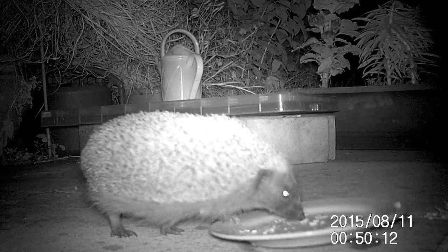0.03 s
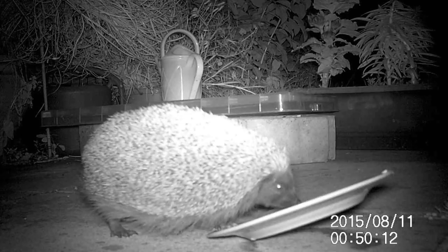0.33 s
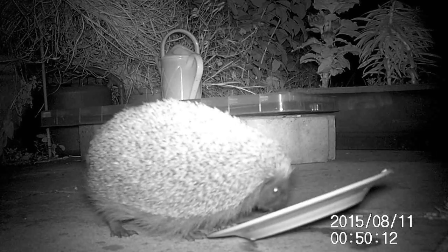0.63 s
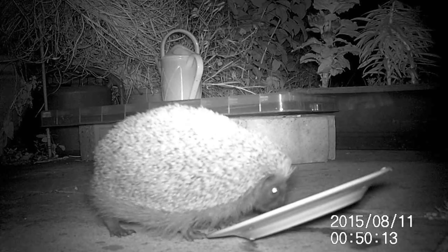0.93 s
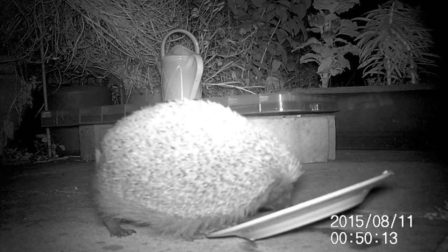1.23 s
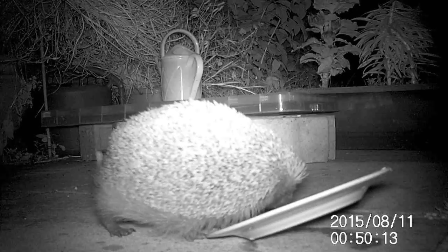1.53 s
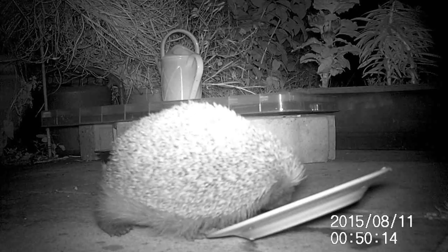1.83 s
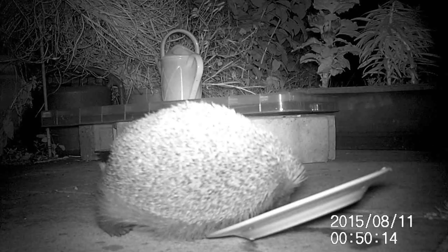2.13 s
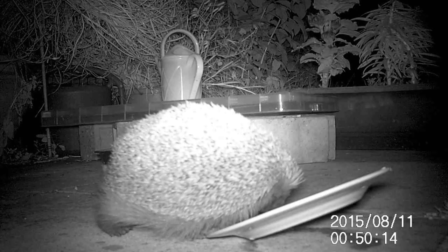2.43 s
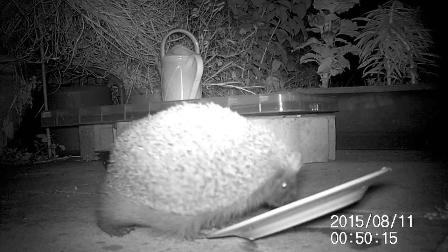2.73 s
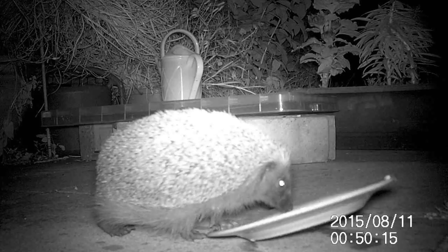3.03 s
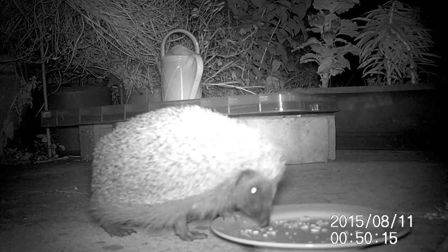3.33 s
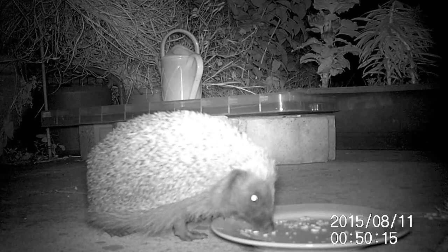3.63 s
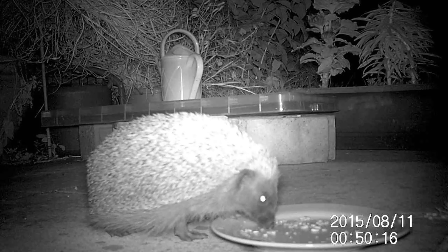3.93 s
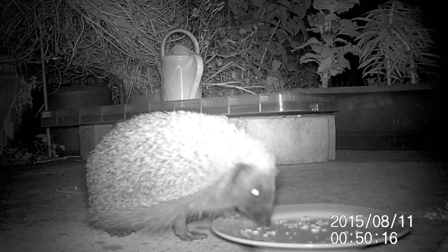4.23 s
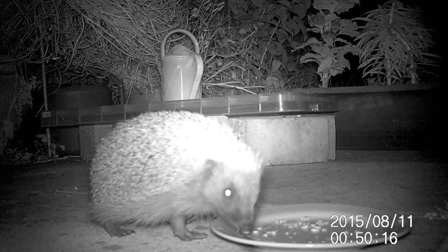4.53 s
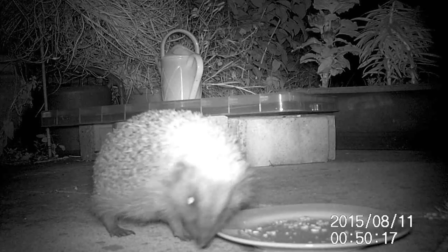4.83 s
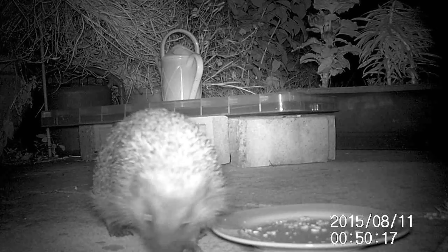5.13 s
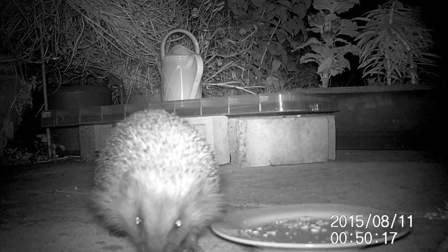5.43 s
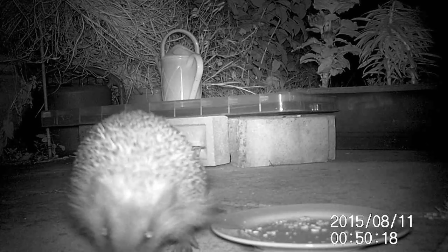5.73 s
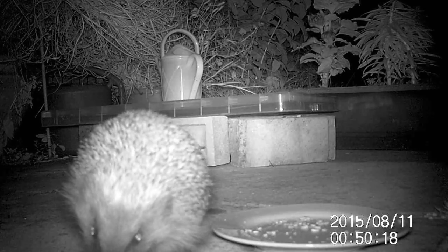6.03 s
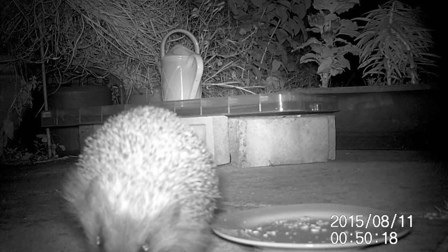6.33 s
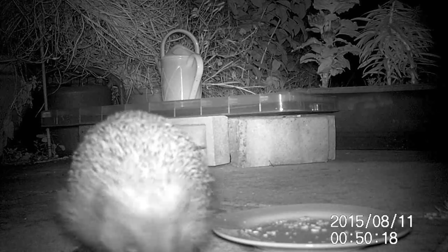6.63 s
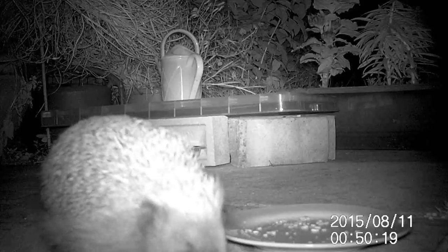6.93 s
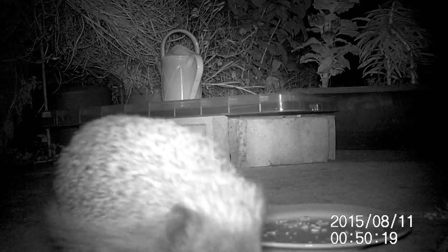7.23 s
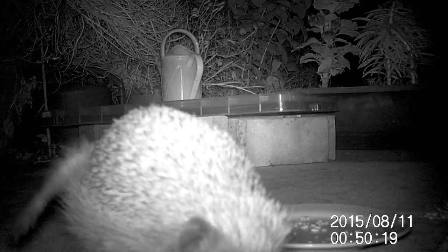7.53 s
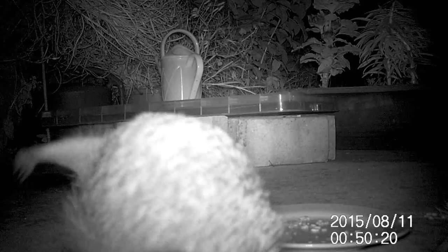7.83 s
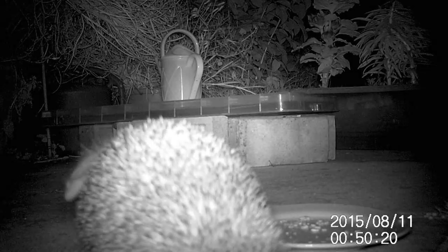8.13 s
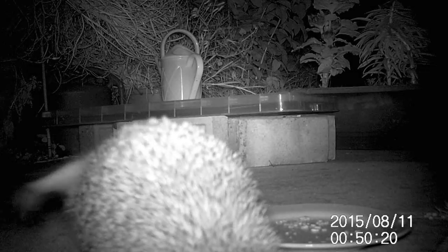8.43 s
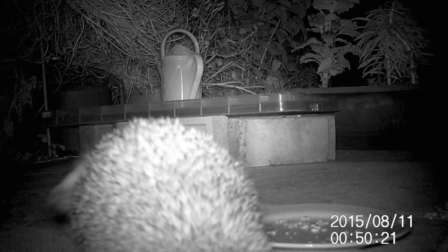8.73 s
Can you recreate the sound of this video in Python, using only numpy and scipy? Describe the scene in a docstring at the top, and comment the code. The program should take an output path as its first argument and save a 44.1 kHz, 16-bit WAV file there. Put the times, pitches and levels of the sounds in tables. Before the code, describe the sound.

A steady hiss and low buzz from a small microphone run under a quiet night garden. In the first half second, a metal plate knocks lightly several times on paving, ringing briefly and crunching grit, with small scuffs from a hedgehog. Faint ticks of claws and spines follow, and an animal wails very faintly far away at about 1.5 seconds. Just after 3 seconds the plate slips in tiny jerks, then lands at 3.25 with a loud, slightly overloaded clank and a quick, dying rattle. A scuff comes at 4.6 and a faint plate tick at 4.9. More thin, distant wails drift by between 5.5 and 7.2 seconds, among scattered rustles. Soft, dull bumps occur now and then, mostly between 5 and 8 seconds. From about 7.8 to 8.8 the hedgehog scratches its spines close by, in about six soft, quick, bristly strokes.

```python
"""A metal plate clanks onto the paving of a night garden after a hedgehog treads on its rim and tips it up.
Each knock of the rim makes the plate ring and crunches a little grit. The hedgehog's claws and stiff
spines rustle in tiny clicks, and near the end it scratches itself close by. Far off an animal wails
faintly, and now and then there is a soft, dull bump. A small night camera adds hiss and a low buzz at
its frame rate, and overloads on the clank."""
import sys
import numpy as np
from scipy import signal
from scipy.fft import rfft, irfft
from scipy.io import wavfile

SR = 44100
rng = np.random.default_rng(int(sys.argv[2]) if len(sys.argv) > 2 else 0)


def unload_wav(signal):
    """Save mono or channel-first audio to the path in sys.argv[1] as 16-bit WAV at rate SR, clipped to [-1, 1]."""
    wavfile.write(
        sys.argv[1],
        SR,
        np.round(np.clip(np.atleast_2d(signal).T, -1, 1) * 32767).astype(np.int16),
    )


N = 395577
T = np.arange(N) / SR

# Levels in the tables are relative: filters and gains act on them later.
# tone of the hiss: pitch_hz, level_db
HISS_TONE = [(20, 14.5), (100, 14.5), (250, 14), (500, 9), (1000, 4), (2000, -0.5), (2800, -0.5),
             (3200, -0.5), (3700, -4), (5000, -5.5), (5600, -16.5)]
# tone of the camera's buzz: pitch_hz, level_db
BUZZ_TONE = [(4, -21), (12, -11), (30, 3), (120, 1.5), (220, -2), (330, -16.5), (500, -14), (670, -4),
             (900, -18), (1350, -12.5), (1800, -28.5), (5000, -30)]
# dips in the camera's power supply, one kind for each load on it: width_ms, depth_db, delay_ms
POWER_DIPS = [(3.6, -3, -2), (5.2, 0, 0), (5.1, 0, 0), (4.4, -1.5, -.8), (7.2, -2.2, .6), (7.3, -2.8, .6)]
# late on, the load holds still for a while at a time: start_s, row_of_power_dips
STEADY_LOADS = [(8.13, 1), (8.43, 4), (8.76, 2)]
# soft low bumps: start_s, level_db
SOFT_BUMPS = [(1.056, -52), (4.774, -50), (5.769, -50), (7.063, -49), (7.757, -48), (7.955, -49),
              (8.058, -45)]
# tone of the bumps: pitch_hz, level_db
BUMP_TONE = [(30, -6), (100, -1), (280, 0), (420, -16), (900, -40)]
# the far animal's calls: start_s, length_s, rise_s, top_pitch_hz, fall_hz, level_db
FAR_CALLS = [(1.463, .76, .36, 1130, 210, -62.5), (5.479, .14, 0.046, 980, 10, -60),
             (5.961, .58, .14, 1105, 120, -65), (6.52, 0.71, .17, 1100, 260, -65.5)]
# single scuffs of claws and spines: peak_time_s, level_db, decay_s
SCUFFS = [(.129, -51, 0.017), (.1615, -48, .007), (0.224, -49, .005), (.246, -49, .008),
          (1.287, -58, .0055), (1.556, -58, .012), (1.774, -54, .008), (2.227, -56, .007),
          (2.96, -57, .007), (4.6365, -47.5, .006), (5.577, -58, .008), (5.693, -57, .006),
          (6.779, -50.5, 0.0087), (6.84, -55, 0.017), (6.989, -57, 0.024), (7.132, -53.5, 0.01)]
# tone of the spines: pitch_hz, level_db
SPINE_TONE = [(500, -27.5), (1500, -23.5), (2500, -14), (2900, -2.5), (3180, 7.5), (3450, -5.5), (3700, -8),
              (4300, -10.5), (5300, -22.5)]
# tone of the grit and of the plate's many weak, crowded notes: pitch_hz, level_db
GRIT_TONE = [(100, -30.5), (250, -7.5), (450, -2), (900, -1), (1400, -4.5), (1900, 1.5), (2300, -4),
             (3300, 5.5), (3900, -8.5), (4500, -18.5), (5300, -23.5)]
# the notes the plate rings with (its modes): pitch_hz, level_db, fade_s (time to fall 60 dB)
PLATE_NOTES = [(515, -28.1, 0.07), (603, -24.3, 0.087), (782, -17, 0.125), (879, -18.5, 0.11),
               (980, -17.4, 0.1), (1037, -12.5, 0.12), (1108, -17.7, 0.094), (1168, -25.8, 0.1),
               (1247, -27.3, 0.093), (1345, -19, 0.1), (1460, -21, 0.07), (1593, -24.5, 0.099),
               (1823, -36.1, 0.169), (1924, -35.6, 0.12), (2048, -28.5, 0.106), (2128, -20, 0.11),
               (2251, -5.5, 0.17), (2454, -19, 0.06), (2697, -25.2, 0.1), (2778, -11, 0.11),
               (2938, -22.4, 0.06), (3109, -32.8, 0.142), (3219, -33.5, 0.163), (3320, -22.0, 0.073),
               (3560, -8.5, 0.11), (4183, -16.6, 0.095), (5090, -46.2, 0.095), (5539, -50.4, 0.118)]
# the rim hits the paving (once, at 0.270 s, a paw thumps the plate dully) and favours one pitch band: start_s,
# level_db, band_hz, lift_db, crunch_db
RIM_KNOCKS = [(.0525, -27.5, 4200, 10, 15.5), (.059, -35, 4200, 5.5, 12), (.0665, -33, 4200, 10.5, 11),
              (.1107, -42, 4200, 6, 18), (.2075, -37, 3150, 15, 12.5), (.270, -37.5, 550, 9, 15.5),
              (.4427, -40, 3560, 11, 4), (1.404, -56, 2250, 1.5, 18), (3.2422, -13, 1000, 8.5, 2.5),
              (3.2472, -14.5, 3800, 19.5, 0.5), (3.2521, .5, 3000, 2, 8.5), (3.2548, -7.5, 3560, 20.5, 10),
              (4.87, -51, 3560, 14, -8)]


def from_db(db):
    """Turn decibels into a number to multiply by."""
    return 10 ** (np.asarray(db) / 20)


def normalise(x):
    """Scale a sound to an average (rms) level of 1."""
    return x / np.sqrt(np.mean(x ** 2))


def mix_in(out, start_s, x):
    """Add x to out from start_s on."""
    i = max(int(start_s * SR), 0)
    out[i:i + len(x)] += x[:max(len(out) - i, 0)]


def shape_tone(x, points, size=8192):
    """Filter a sound along a curve of (pitch_hz, level_db) points."""
    hz, db = np.transpose(points)
    freqs = np.maximum(np.fft.rfftfreq(size, 1 / SR), 1)
    gains = from_db(np.interp(np.log(freqs), np.log(hz), db))
    # folding the cepstrum keeps the filter from sounding before its input does
    cepstrum = irfft(np.log(gains))
    cepstrum[1:size // 2] *= 2
    cepstrum[size // 2 + 1:] = 0
    return signal.fftconvolve(x, irfft(np.exp(rfft(cepstrum))))[:len(x)]


def toned_noise(tone, samples=N):
    """Noise with the given tone, at an average level of 1."""
    return normalise(shape_tone(rng.standard_normal(samples), tone))


def fade(t, fade_s):
    """Die away smoothly, falling 60 dB in fade_s."""
    return np.exp(-np.log(1000) * t / fade_s)


def wander(steps_per_s):
    """Random values joined by straight lines."""
    steps = rng.standard_normal(int(T[-1] * steps_per_s) + 2)
    return np.interp(T * steps_per_s, np.arange(len(steps)), steps)


def quickening(k, start_s, gap_s, shrink):
    """Time of step k when each gap is shrink times the one before."""
    return start_s + gap_s * (1 - shrink ** k) / (1 - shrink)


def echoes(x, fade_s, echo_db):
    """Add the scattered echoes that come back from walls and plants."""
    t = T[:SR]
    tail = rng.standard_normal(SR) * fade(t, fade_s) * (1 - np.exp(-t / .004))
    return x + from_db(echo_db) * signal.fftconvolve(x, tail / np.linalg.norm(tail))[:N]


def hiss(gain_db=-57.5, drift_db=-.34):
    """Microphone noise and still night air make an even hiss."""
    return toned_noise(HISS_TONE) * from_db(gain_db + drift_db * wander(2.8))


def camera_buzz(gain_db=-34.5, first_frame_s=.0182, frame_s=.033192, rounds_per_s=5.05, scatter_ms=.093):
    """Each picture frame pulls the power down for a few milliseconds, which leaks into the sound."""
    dips = np.zeros(N)
    starts = np.arange(first_frame_s, T[-1], frame_s)
    rows = (starts * rounds_per_s % 1 * len(POWER_DIPS)).astype(int)  # a repeating round of loads
    for start_s, row in STEADY_LOADS:
        rows[starts > start_s] = row
    for start_s, row, chance in zip(starts, rows, rng.standard_normal((len(starts), 2))):
        width_ms, depth_db, delay_ms = POWER_DIPS[row]
        width_s = (width_ms + scatter_ms * chance[0]) / 1000
        delay_s = (delay_ms + scatter_ms * chance[1]) / 1000
        mix_in(dips, start_s + delay_s - width_s / 2, -from_db(depth_db) * np.ones(int(width_s * SR)))
    rasp = 1 + rng.standard_normal(N)  # the load is restless during each dip
    return from_db(gain_db) * shape_tone(dips * rasp, BUZZ_TONE)


def bumps(attack_s=.002, fade_s=.13):
    """Short bursts of low noise sound as soft, dull bumps."""
    t, loudness = T[:SR // 2], np.zeros(N)
    for start_s, level_db in SOFT_BUMPS:
        mix_in(loudness, start_s, from_db(level_db) * (1 - np.exp(-t / attack_s)) * fade(t, fade_s))
    return loudness * toned_noise(BUMP_TONE)


def far_wails(rise_hz=85, attack_s=.1, release_s=.12, flutter_db=2.2):
    """A far animal's thin, unsteady calls climb in pitch and sag again, blurred by the distance."""
    calls = np.zeros(N)
    wobble = 1 + .04 * wander(130)
    for start_s, length_s, rise_s, top_hz, fall_hz, level_db in FAR_CALLS:
        t = np.clip(T - start_s, 0, length_s)
        left_to_climb = np.maximum(1 - t / rise_s, 0)
        sag = (np.maximum(t - rise_s, 0) / (length_s - rise_s)) ** 2
        pitch_hz = (top_hz - rise_hz * left_to_climb - fall_hz * sag) * wobble
        swell = np.minimum(t / attack_s, 1) * np.minimum((length_s - t) / release_s, 1)
        calls += from_db(level_db) * swell * np.sin(2 * np.pi * np.cumsum(pitch_hz) / SR)
    return echoes(calls * from_db(flutter_db * wander(15)), fade_s=.44, echo_db=-3)


def claw_ticks(count=10, from_s=1.3, to_s=7.3, level_db=-62, scatter_db=2, decay_s=.007):
    """The claws tick at random as the hedgehog looks for food; gives rows like SCUFFS."""
    return [(from_s + (to_s - from_s) * (k + when) / count, level_db + scatter_db * (2 * size - 1), decay_s)
            for k, (when, size) in enumerate(rng.random((count, 2)))]


def leg_strokes(count=6, period_s=.174, hardest_at_s=8.26):
    """The scratching hind leg settles to its pace as its effort swells and eases; rows like SCUFFS."""
    def time_s(k):
        return quickening(k, start_s=7.792, gap_s=.054, shrink=.58) + k * period_s

    def effort_db(s):
        return -41.2 - 18 * (s - hardest_at_s) ** 2

    kick_times = time_s(np.arange(count))
    kicks = [(s, effort_db(s), .0075) for s in kick_times]
    # the claws meet the coat just before each kick, and the leg swings back around the kicks
    touches = [(s - .016, effort_db(s) - 9, .007) for s in kick_times]
    swings = [(s, effort_db(s) - 10.5, .013) for s in time_s(np.arange(count + 1) - .5)]
    return kicks + touches + swings


def hedgehog_rustle(gain_db=-2, clicks_per_s=5000, scatter_db=4, bend_s=.0013, brush_db=-20.5, brush_s=.03):
    """Each stroke bends many stiff spines, which click back; softer brushing leads in and out."""
    force = np.zeros(N)
    t = T[:SR // 2] - .25  # zero at the peak of the stroke
    brush = from_db(brush_db) * np.exp(-abs(t) / brush_s)
    for peak_time_s, level_db, decay_s in SCUFFS + leg_strokes() + claw_ticks():
        flick = np.exp(-np.maximum(-t / bend_s, t / decay_s))
        force += np.interp(T, peak_time_s + t, from_db(level_db) * (flick + brush), left=0, right=0)
    clicks = (rng.random(N) < clicks_per_s / SR) * rng.choice([-1, 1], N)
    sizes = from_db(scatter_db * rng.standard_normal(N))
    return from_db(gain_db) * force * normalise(shape_tone(clicks * sizes, SPINE_TONE))


def plate_slips(count=4, level_db=-51, band_hz=3000, lift_db=7, crunch_db=12.5):
    """The tilted plate slips in ever quicker jerks before it falls; gives rows like RIM_KNOCKS."""
    times = quickening(np.arange(count), start_s=3.09, gap_s=.055, shrink=.73)
    return [(s, level_db, band_hz, lift_db, crunch_db) for s in times]


def plate_bounces(count=3, level_db=-20, loss_db=8, band_hz=2250, lift_db=6, crunch_db=0):
    """The fallen plate rocks, each bounce sooner and weaker; gives rows like RIM_KNOCKS."""
    times = quickening(np.arange(count), start_s=3.2825, gap_s=.0205, shrink=.58)
    return [(s, level_db - k * loss_db, band_hz, lift_db, crunch_db) for k, s in enumerate(times)]


def metal_plate(linger_db=-23, linger_stretch=1.9, wash_db=-20, grit_db=-11):
    """Each hit of the rim rings the same notes, over a wash of weaker ones, and crunches some grit."""
    t, out = T[:SR // 2], np.zeros(N)
    ring = np.zeros(len(t))
    for k, (pitch_hz, level_db, fade_s) in enumerate(PLATE_NOTES):
        # a small share of each note lingers; neighbouring notes swing opposite ways at the rim
        decay = fade(t, fade_s) + from_db(linger_db) * fade(t, fade_s * linger_stretch)
        ring += (-1) ** k * from_db(level_db) * decay * np.sin(2 * np.pi * pitch_hz * t)
    wash = from_db(wash_db) * fade(t, fade_s=.13)
    for start_s, level_db, band_hz, lift_db, crunch_db in RIM_KNOCKS + plate_slips() + plate_bounces():
        crunch = from_db(grit_db + crunch_db) * fade(t, fade_s=.028)
        noise = toned_noise(GRIT_TONE, len(t)) * (wash + crunch)
        # where and how hard the rim hits decides which notes answer: those outside the band are softer
        hit_tone = [(band_hz * ratio, -share * lift_db)
                    for ratio, share in [(.2, 1.5), (.8, 1), (1, 0), (1.25, 1), (5, 2)]]
        mix_in(out, start_s, from_db(level_db) * shape_tone(ring + noise, hit_tone))
    return out


def scene():
    """Plate and hedgehog between low garden walls, over far wails, buzz, hiss and bumps."""
    near = echoes(metal_plate() + hedgehog_rustle(), fade_s=.25, echo_db=-28)
    return (near + far_wails() + camera_buzz() + hiss() + bumps())[None]


def record(dry, headroom=1.7, treble_limit_hz=5500, output_limit_hz=16000, offset=.019):
    """The camera squashes loud peaks and cuts the treble; the sound is then clipped and stored at 16 bits, and
    sits a little off centre."""
    overloaded = headroom * np.tanh(dry / headroom)
    dulled = signal.sosfilt(signal.ellip(10, .2, 80, treble_limit_hz, fs=SR, output="sos"), overloaded)
    stored = np.round(np.clip(dulled, -1, 1) * 2 ** 15) / 2 ** 15
    return offset + signal.sosfilt(signal.ellip(8, .2, 70, output_limit_hz, fs=SR, output="sos"), stored)


dry = scene()
out = record(dry)
unload_wav(out)
```